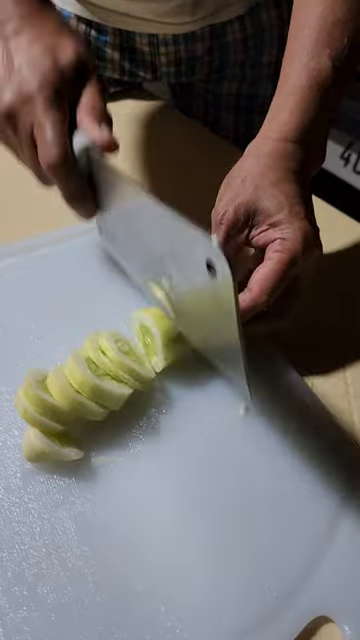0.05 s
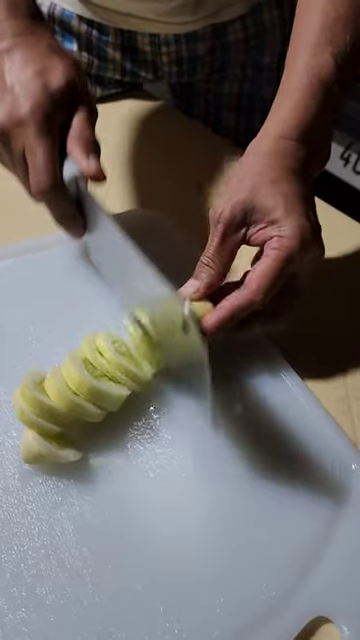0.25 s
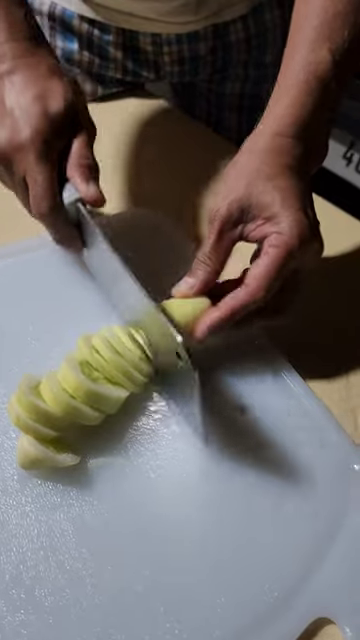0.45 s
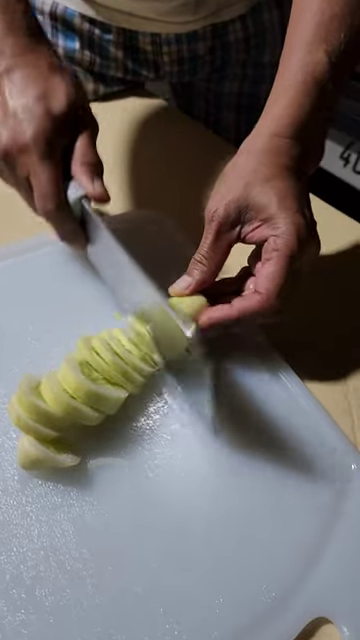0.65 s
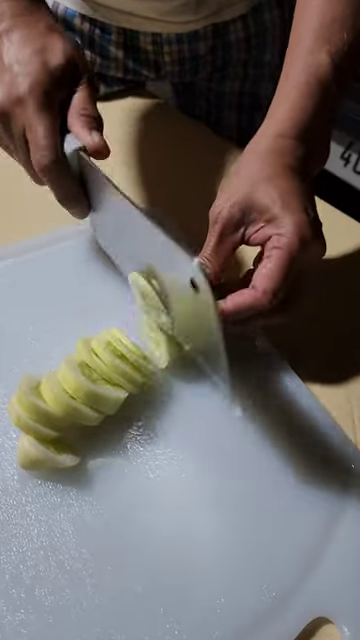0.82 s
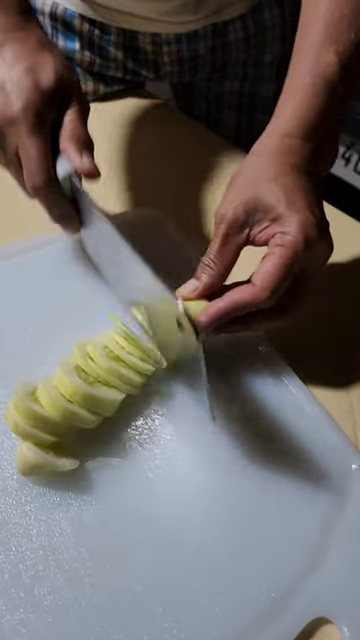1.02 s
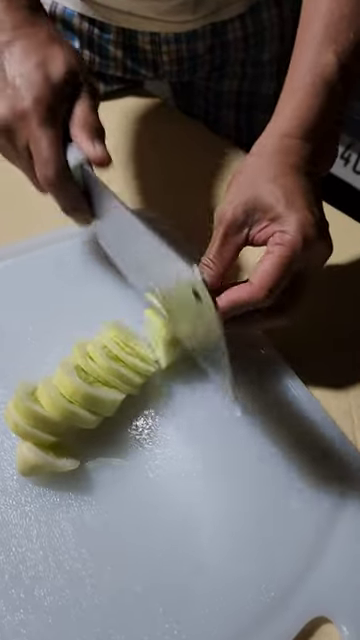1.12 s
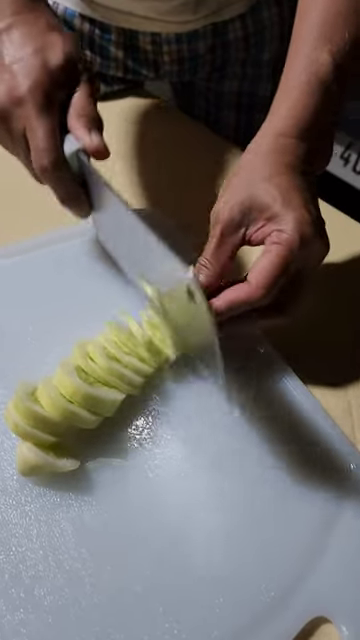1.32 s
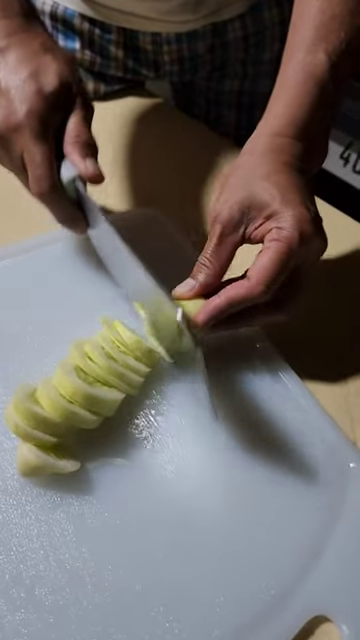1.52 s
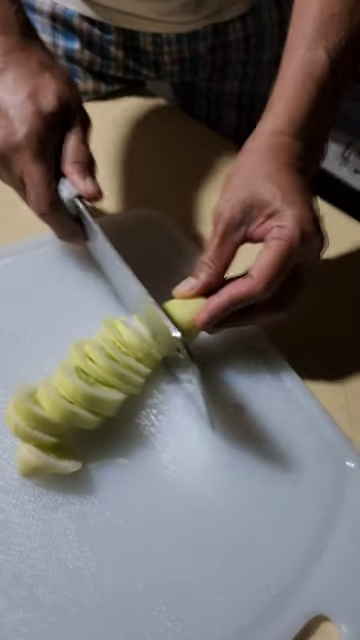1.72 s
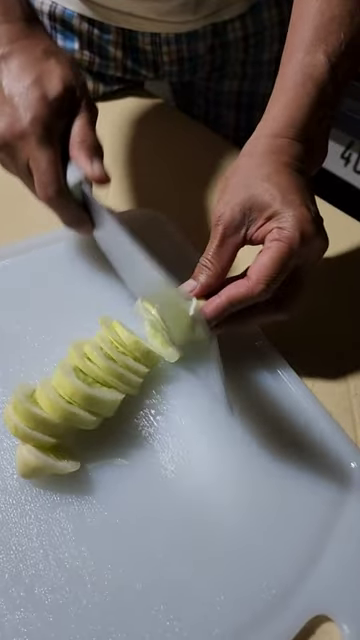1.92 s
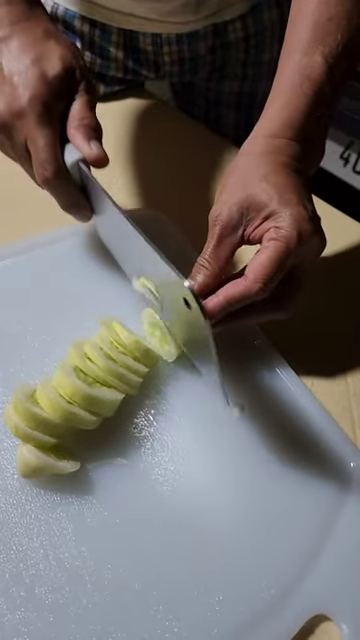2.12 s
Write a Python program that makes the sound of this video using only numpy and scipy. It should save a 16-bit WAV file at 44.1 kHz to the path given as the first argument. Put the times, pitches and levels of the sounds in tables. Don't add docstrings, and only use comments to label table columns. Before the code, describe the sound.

Cleaver chopping cucumber on a plastic board over a hollow table, close in stereo. Seven landings at about 0.28, 0.55, 0.81, 1.05, 1.34, 1.57 and 1.82 s: brief crunchy hiss, bright crack, low boom near 150-170 Hz. The first cracks loudest, the fifth is softest. Faint wet slips and blade shimmer follow; an eighth cut begins at 2.05 s without landing. Short small-kitchen reverberation, low quiet room tone.

```python
import sys
import numpy as np
from scipy import signal
from scipy.fft import rfft, irfft
from scipy.io import wavfile
from scipy.ndimage import uniform_filter1d

SR = 44100
rng = np.random.default_rng(int(sys.argv[2]) if len(sys.argv) > 2 else 0)


def gain_from_decibels(decibels):
    exponent = np.asarray(decibels, float) / 20
    return 10 ** exponent


def output_pcm(signal):
    pcm = np.clip(np.atleast_2d(signal).T, -1, 1) * 32767
    wavfile.write(sys.argv[1], SR, np.round(pcm).astype(np.int16))


N = 94815

# (frequency [Hz], level [dB])
AIR_SPECTRUM = [(15, -5), (40, -0.5), (150, 3.5), (300, -11.5), (700, -16), (2100, -19), (3000, -26),
                (16000, -38)]
# (frequency [Hz], correlation [0-1])
AIR_LIKENESS = [(40, 0.65), (200, 1), (500, 0.44), (4000, 0.053), (15000, 0.061)]
# (frequency [Hz], T60 [s])
ROOM_T60 = [(150, 0.29), (500, 0.31), (1500, 0.35), (4000, 0.3), (8000, 0.37), (15000, 0.19)]
# (frequency [Hz], level [dB])
ROOM_SPECTRUM = [(210, -14), (350, -6.5), (754, -6), (990, -10.5), (1300, -6.5), (1700, -10), (6430, -18),
                 (11600, -33.5), (16000, -36)]
# (time [s], level [dB], frequency [Hz], length [s])
NUDGES = [(.004, -30.5, 108.4, 0.012), (0.021, -32.5, 69, 0.02), (0.071, -29.5, 69, 0.0227),
          (0.096, -42, 70, 0.024), (0.114, -43, 89, 0.018), (0.533, -29, 121, 0.0074),
          (0.765, -26, 55, 0.021), (1.025, -24.5, 55, 0.023), (1.327, -23, 138, 0.0098),
          (2.054, -26.5, 60.5, 0.028), (2.116, -31, 100, 0.0066)]
# (time [s], level [dB], frequency [Hz], minus: starts inward, length [s])
PUSHES = [(.2385, -17, -150, .027), (.5010, -31, 130, .024), (.7645, -18.5, 135, .025),
          (1.0160, -20, 145, .023), (1.2900, -33, 130, .024), (1.5315, -26, 130, .027),
          (1.7800, -26, 140, .024), (2.0530, -22, -140, .019)]
# (time [s], level
# [dB], frequency [Hz], length [s])
SQUEAKS = [(.502, -44, 1950, .01), (1.374, -39, 750, .036), (1.549, -43, 2640, .021),
           (1.551, -37, 880, .02), (1.556, -40, 2050, .015), (1.779, -47, 8400, .012)]
# (time [s], level [dB],
# length [s], brightness [dB/octave])
RUSTLES = [(0.264, -31, 0.012, -1.2), (.526, -42, .004, 1.2), (.536, -39, .008, -5),
           (0.792, -30, 0.011, -1.5), (.83, -41, .003, 1.5), (0.94, -46.5, 0.0029, -3),
           (1.036, -44, .009, -3), (1.325, -43, .008, -1.5), (1.368, -47, 0.005, 1.2),
           (1.552, -35, 0.011, -5.5), (1.815, -41, .007, -4), (2.059, -50, 0.014, 2),
           (2.091, -49, 0.012, 1.5)]
# (frequency [Hz], width [Hz], level [dB])
SONG_MODES = [(4950, 220, -1), (6440, 220, -5.5), (7470, 240, -3), (9970, 350, -7.5), (11220, 220, -3),
              (11700, 550, -7), (15200, 500, -9.5)]
# (frequency [Hz], level [dB], T60 [s])
TABLE_MODES = [(172.9, 1.5, 0.32), (132.8, -11, 0.26), (82.6, -7.5, 0.12)]
# (frequency [Hz], level [dB], T60 [s])
BOARD_MODES = [(153.35, 2.84, 0.312)]
# (frequency [Hz], level [dB], T60 [s])
LEG_MODES = [(44.4, -24.5, 0.3), (107.2, -28.5, 0.24)]
# (frequency [Hz], level [dB], T60 [s])
OVERTONES = [(349.5, -4.5, 0.2), (298.3, -2, 0.15), (263, -13, 0.18), (219, -4.5, 0.14)]
# (frequency [Hz], level [dB], T60 [s])
SLAP_MODES = [(478, -23, 0.065), (540, -29, 0.2), (639.7, -32, 0.26), (744, -26, 0.036)]
# (frequency [Hz], level [dB], T60 [s])
FRAME_MODES = [(287.6, -22.5, 0.6), (226.8, -23.5, 0.65), (334, -21.5, 0.45)]
# (frequency [Hz], left level [dB], right level [dB], T60 [s])
KNOCK_MODES = [(627.5, -11, -0.5, 0.062), (792, -8, -10, 0.031), (878, -24, 1.5, 0.045),
               (1015, 1.5, -13, 0.049), (1207, -27, -1.5, 0.042), (1480, -0.5, -1.5, 0.016),
               (1746, -8, -4.5, 0.065), (2030, 7.5, -1, 0.024), (2310, -1.5, -14, 0.028),
               (2620, -22, -6, 0.02), (3180, 8, -8.5, .025), (3180, -18, -7, 0.015), (3550, -4, -21, .03),
               (3900, -12, 0, .03)]
# (frequency [Hz], level [dB])
FLESH_SPECTRUM = [(350, 0), (600, -18), (768, -7.5), (3300, -18.5), (4460, -20.5), (8620, -17.5),
                  (16000, -29)]
# (time [s], skin tick [dB], flesh hiss [dB])
CUTS = [(0.2384, -41, -35.5), (0.5008, -51, -40), (0.7644, -46, -37.5), (1.0149, -57, -43),
        (1.283, -65, -44), (1.5326, -40.5, -42.5), (1.783, -52, -43.5), (2.0502, -35, -46.5)]
# (time [s], crack [dB], table boom [dB], board boom [dB], knock [dB])
CHOPS = [
    (0.2793, 1.5, -15, -16, -19),
    (0.5479, -2, -16.5, -23.5, -12),
    (.81283, -4.5, -13.5, -15.5, -21),
    (1.0508, -3.5, -14, -24, -15.5),
    (1.3372, -8, -19, -16, -32),
    (1.5708, -6.5, -15, -19.5, -16.5),
    (1.8246, -4, -15, -18, -15.5),
]
# (room send [dB], brightness [dB/octave], blade song [dB], contact time [s])
AFTERMATH = [(-2, -1.04, -54, 0.000079), (5.5, -0.86, -38.5, 0.000088), (-1.5, -2.5, -46.5, 0.00016),
             (5.5, -0.2, -44, 0.000083), (-2.5, -2, -52.5, 0.00006), (3.5, -0.16, -47.5, 0.00011),
             (1.1, 0.35, -46, 0.0001)]
# (time until its weight eases [s], drop of the boom [dB],
# slap of the middle tones [dB], knock brightness [dB/octave], rebound [dB])
SEATS = [(0.051, -5, 1.5, 0.7, -3.5), (0.068, -8, -18.5, -0.5, 7.5), (0.024, -4, 0, -0.5, 2),
         (0.053, -7.5, 0.5, 0, 5.5), (0.023, -6, -17, -2, -1.5), (0.061, -2.5, 0, -1, 3),
         (0.083, -3, 3.5, -0.3, 4)]
# (overtones [dB], legs [dB], boom decay stretch [factor], boom rise [s])
SPOTS = [(-18, 0, 0.92, .0005), (-22.5, -3, 1.5, 0.0025), (-20, 5.5, 0.86, 0.00097),
         (-19.5, 0, 1.27, 0.00029), (-24, -18, 1.05, 0.0014), (-14, -6, 0.99, 0.0012),
         (-17, 1, 1.17, 0.00067)]
# (frequency [Hz], level [dB], T60 [s])
CLANGS = [
    [(1340, -9, 0.018), (2290, -11, 0.015), (1800, -25, .03)],
    [(1363, -1, 0.015), (2175, -5, 0.021), (4200, -17, 0.021), (1156, -14, 0.028), (3570, -37, 0.015),
     (1790, -32, 0.082)],
    [(900, -17.5, 0.043), (1790, -34, .03), (2250, -24, 0.04)],
    [(1350, -37, 0.036), (2100, -15, .02), (2990, -20, 0.025), (5700, -26, 0.027)],
    [(1800, -25, 0.012), (2400, -30, .04), (3450, -34.5, 0.067)],
    [(1470, -10, 0.032), (558, -21, 0.036), (2060, -26, 0.011), (3320, -20, 0.023)],
    [(1460, -14, 0.018), (2425, -14, 0.019), (4100, -17, 0.019)],
]

LIMIT, EDGE_HZ = 0.97, 15900
SLAP_TOP_HZ = 1030
PUSH_LEAN = 1.1
BOARD_LAG_S = 0.00083


def evened(x):
    return x / np.sqrt(np.mean(x ** 2) + 1e-20)


def read(points, hz):
    f, value = np.transpose(points)
    return np.interp(np.log(hz + 1), np.log(f + 1), value)


def add(mix, s, sound):
    part = mix[:, round(s * SR):][:, :sound.shape[-1]]
    part += sound[..., :part.shape[1]]


def noise(count, colour, same, tilt_db=0):
    hz = np.fft.rfftfreq(count, 1 / SR)
    left, other = rfft(rng.standard_normal((2, count)))
    likeness = np.clip(read(same, hz), -1, 1)
    right = likeness * left + np.sqrt(1 - likeness ** 2) * other
    shape = gain_from_decibels(read(colour, hz) + tilt_db * np.log2((hz + 100) / 2000))
    return evened(irfft(np.array([left, right]) * shape, count))


def ring(modes, db, lag=0., rise=1e-4):
    t = np.maximum(np.arange(SR // 2) / SR - lag, 0)
    waves = sum(gain_from_decibels(db + d - 60 * t / t60) * np.sin(2 * np.pi * hz * t) for hz, d, t60 in modes)
    return waves * (1 - np.exp(-t / rise))


def air():
    drift = evened(uniform_filter1d(rng.standard_normal(N), 3000))
    return gain_from_decibels(-44 + drift) * noise(N + N % 2, AIR_SPECTRUM, AIR_LIKENESS)[:, :N]


def room(db, tilt_db, slap_db):
    tail = noise(32768, ROOM_SPECTRUM, [(1, 0.04), (2, 0.04)], tilt_db)
    hz, t, z = signal.stft(tail, SR, nperseg=128)
    fall = -60 * t / read(ROOM_T60, hz)[:, None]
    decay = gain_from_decibels(fall) + gain_from_decibels(-23.5 + fall / 2.63) + gain_from_decibels(-0.5 - 60 * t / 0.061)
    hollow = slap_db * np.exp(-(t / 0.087) ** 2) / (1 + (hz[:, None] / SLAP_TOP_HZ) ** 4)
    tail = signal.istft(z * gain_from_decibels(hollow) * decay, SR, nperseg=128)[1]
    onset = np.minimum(np.arange(tail.shape[1]) / (0.00033 * SR), 1)
    return gain_from_decibels(-22.5 + db) * tail * onset


def shove(db, hz, length, lean):
    u = np.arange(0, length, 1 / SR) / length
    return gain_from_decibels(db) * np.sin(np.pi * u ** lean) * np.sin(2 * np.pi * hz * length * u)


def slip(db, length, tilt_db):
    u = np.arange(4096) / SR / length
    grains = gain_from_decibels(2.5 * evened(uniform_filter1d(rng.standard_normal(4096), 60)))
    wet = noise(4096, FLESH_SPECTRUM, [(1, .4), (2, 0.69)], tilt_db)
    return gain_from_decibels(db) * u * np.exp(1 - u) * grains * wet


def song(db):
    t, out = np.arange(8192) / SR, 0
    for hz, width, d in SONG_MODES:
        r = np.exp(-np.pi * width / SR)
        a, b = rng.standard_normal((2, 2, 8192))
        slow = signal.lfilter([1], [1, -r], a + 1j * b)
        slow = signal.lfilter([1], [1, -r], slow)
        out = out + gain_from_decibels(d) * evened((slow * np.exp(2j * np.pi * hz * t)).real)
    u = t / 0.04
    patches = gain_from_decibels(3.8 * evened(uniform_filter1d(rng.standard_normal(8192), 300)))
    return gain_from_decibels(db) * out * patches * (u * np.exp(1 - u)) ** 2.86


def boom(table_db, board_db, lift, lift_db, slap_db, upper_db, legs_db, slow, rise):
    t = np.arange(SR // 2) / SR

    def held(modes):
        return [(hz, db, t60 * slow) for hz, db, t60 in modes]

    top = ring(held(TABLE_MODES), table_db, 0.0015, rise)
    board = ring(held(BOARD_MODES), board_db, BOARD_LAG_S, rise)
    board = board + ring(OVERTONES, upper_db, 0.0016, rise)
    legs = ring(LEG_MODES, legs_db, 0.00037, 0.012)
    slap = ring(SLAP_MODES, slap_db, BOARD_LAG_S, rise)
    side = gain_from_decibels(-28) * (top - board) + 0.15 * np.roll(legs, 150) + 0.31 * np.roll(slap, 15)
    wide = np.array([[1], [-1]]) * side
    eased = gain_from_decibels(lift_db * np.clip((t - lift) / 0.0044 + .5, 0, 1))
    return (top + board - legs + slap + wide) * eased + ring(FRAME_MODES, table_db, BOARD_LAG_S, 0.006)


def cut(length, tick_db, hiss_db):
    t = np.arange(8192) / SR
    grains = gain_from_decibels(3.5 * evened(uniform_filter1d(rng.standard_normal(8192), 90)))
    swell = gain_from_decibels(hiss_db + np.interp(t / length, [0, .7, 1, 1.3], [0, -7, 3, -30]))
    tick = gain_from_decibels(tick_db - 60 * t / 0.02)
    level = (swell * grains + tick) * np.minimum(t / 0.00044, 1)
    return level * noise(8192, FLESH_SPECTRUM, [(1, .5), (2, 0.18)])


def crack(db, knock_db, contact, clang, slap_db, tilt_db, rebound_db):
    t = np.arange(3000) / SR
    thin = np.clip(1 - gain_from_decibels(slap_db), 0, 1)

    def bell(at, s):
        return np.exp(-.5 * ((t - at) / s) ** 2) * contact / s

    def blow(at):
        return bell(at, contact) - thin * bell(at + contact, 2.4 * contact)

    blows = [blow(0.00046) + gain_from_decibels(rebound_db) * blow(0.00026 + 0.00076 * k) for k in (1.05, .95)]
    out = -gain_from_decibels(db) * np.array(blows)
    spread = 1.5 * (2 * rng.random(len(KNOCK_MODES)) - 1)
    for side in (0, 1):
        modes = []
        for (hz, *ears, t60), r in zip(KNOCK_MODES, spread):
            hollow = slap_db / (1 + (hz / SLAP_TOP_HZ) ** 4)
            modes.append((hz, ears[side] + r + tilt_db * np.log2(hz / 1500) + hollow, t60))
        lag = 0.00027 + 0.00018 * (1 - side)
        out[side] -= (ring(modes, knock_db, lag, 0.00073) + ring(clang, 0, 0.00029, 0.0011))[:3000]
    spit = gain_from_decibels(-60 * t / 0.19) + gain_from_decibels(13 - 60 * t / 0.0068)
    wet = noise(3000, FLESH_SPECTRUM, [(1, .5), (2, 0.84)], 0.74)
    return out + gain_from_decibels(db - 31.5) * spit * wet * np.minimum(t / 0.00054, 1)


def scene():
    mix = air()
    ends = [row[0] for row in CHOPS] + [CUTS[-1][0] + 0.035]
    for (s, *row), end in zip(CUTS, ends):
        add(mix, s, cut(end - s, *row))
    for chop, after, seat, spot, clang in zip(CHOPS, AFTERMATH, SEATS, SPOTS, CLANGS):
        s, crack_db, table_db, board_db, knock_db = chop
        send_db, tilt_db, song_db, contact = after
        add(mix, s, crack(crack_db, knock_db, contact, clang, *seat[2:]))
        add(mix, s, boom(table_db, board_db, *seat[:3], *spot))
        add(mix, s, room(send_db, tilt_db, seat[2]))
        add(mix, s, song(song_db))
    for s, db, hz, length in PUSHES:
        add(mix, s, shove(db, hz, length, PUSH_LEAN))
        add(mix, s, ring(TABLE_MODES + BOARD_MODES, db - 22, 0.0102, 0.0082))
    for s, db, hz, length in NUDGES:
        add(mix, s, -shove(db, hz, length, 1.2))
    for s, db, hz, length in SQUEAKS:
        add(mix, s, shove(db, hz, length, PUSH_LEAN))
    for s, *row in RUSTLES:
        add(mix, s, slip(*row))
    return mix


def band_limit(x):
    return signal.sosfilt(signal.butter(12, 16650, fs=SR, output="sos"), x)


def record(dry):
    held = dry / (1 + abs(dry / LIMIT) ** 4) ** .25
    held = signal.oaconvolve(held, signal.firwin(255, EDGE_HZ, fs=SR)[None], "same")
    return band_limit(held)


dry = scene()
out = record(dry)
output_pcm(out)
```